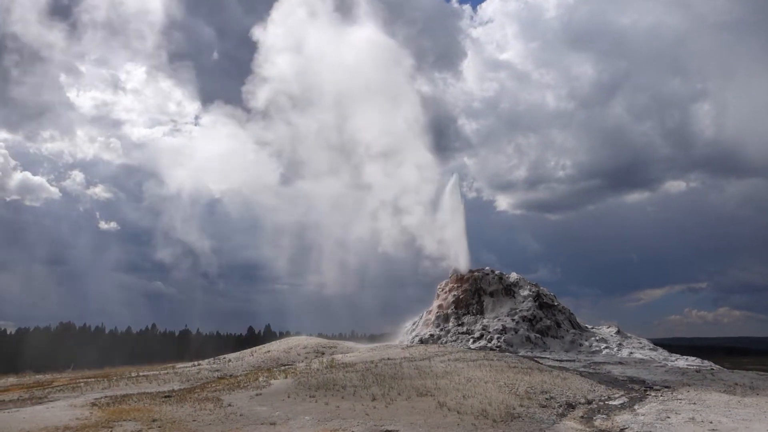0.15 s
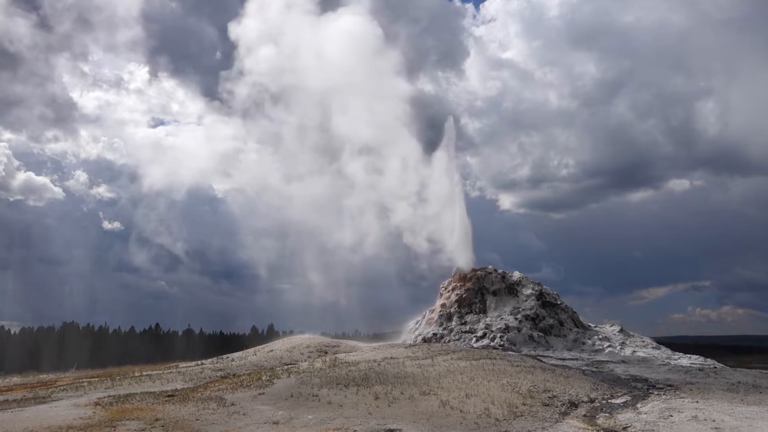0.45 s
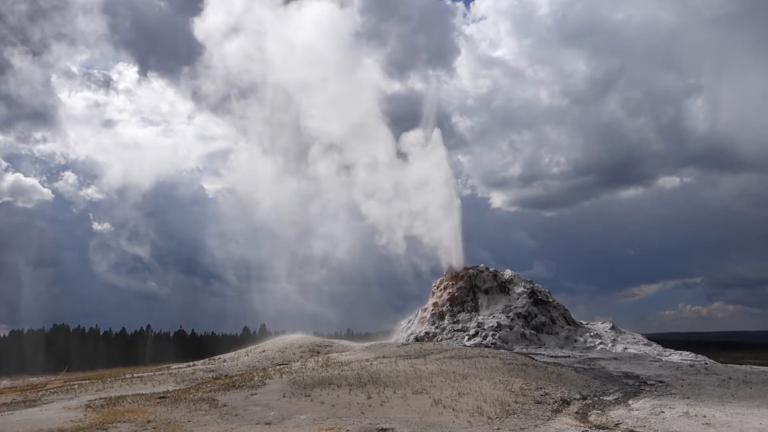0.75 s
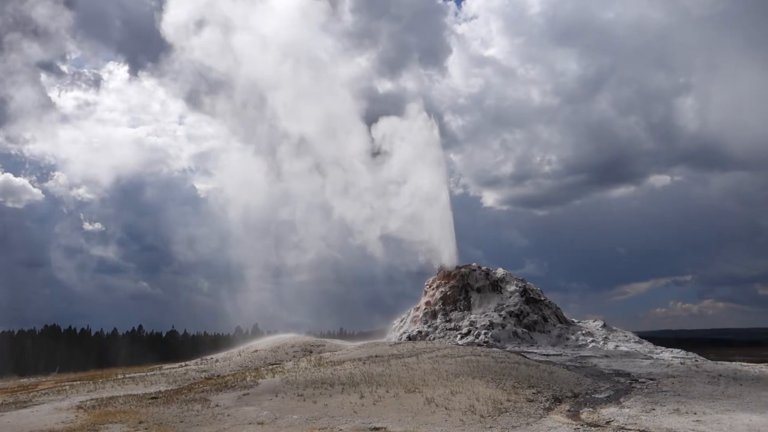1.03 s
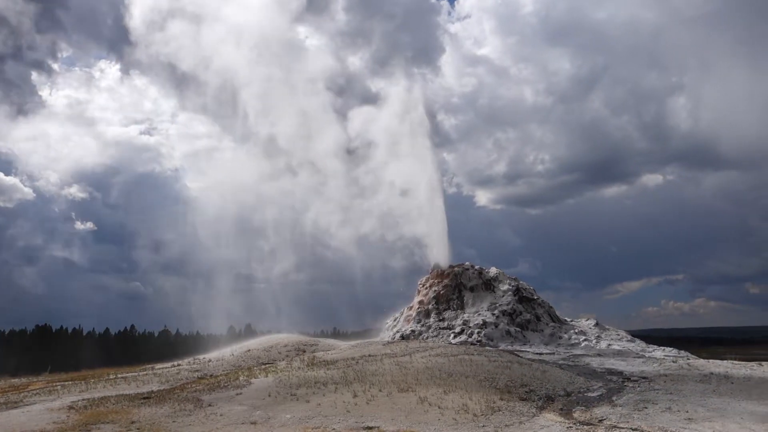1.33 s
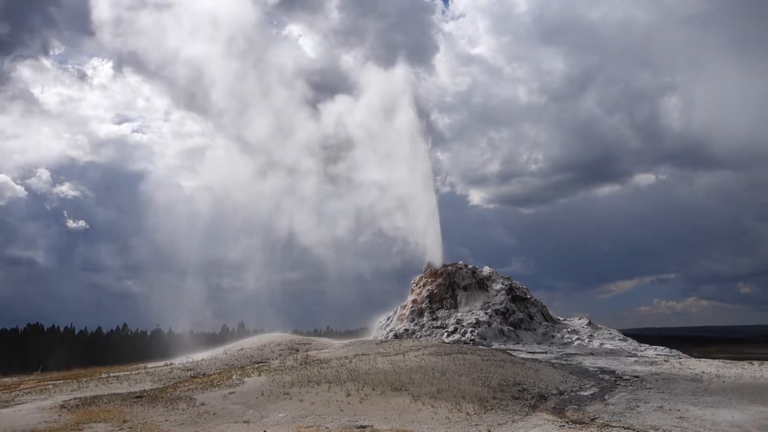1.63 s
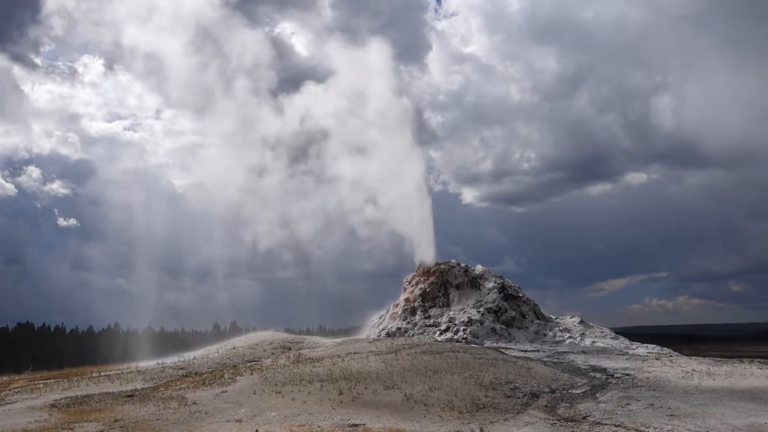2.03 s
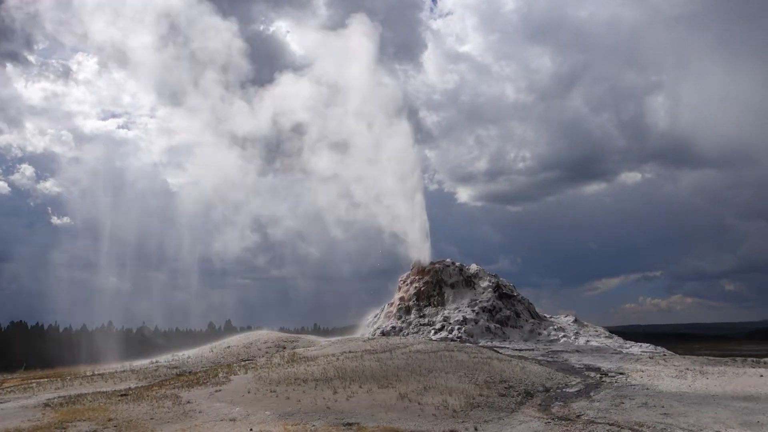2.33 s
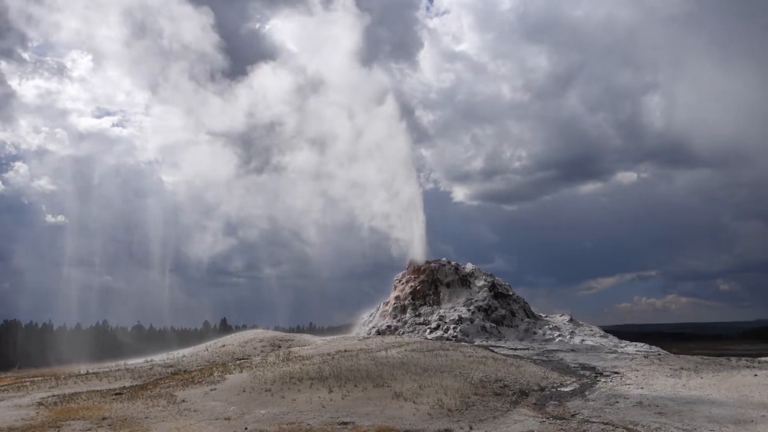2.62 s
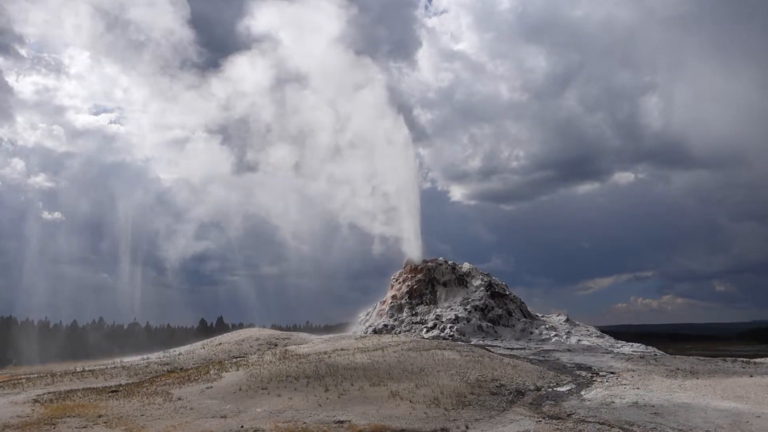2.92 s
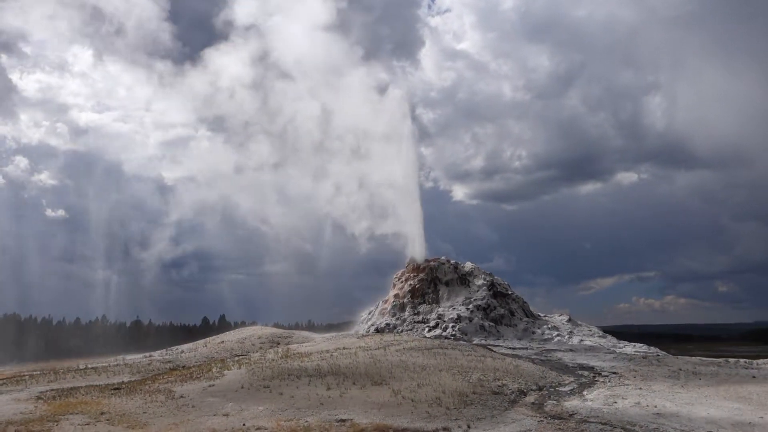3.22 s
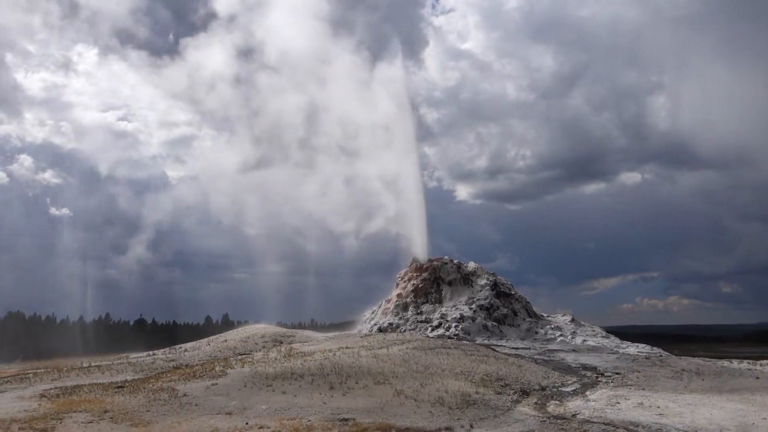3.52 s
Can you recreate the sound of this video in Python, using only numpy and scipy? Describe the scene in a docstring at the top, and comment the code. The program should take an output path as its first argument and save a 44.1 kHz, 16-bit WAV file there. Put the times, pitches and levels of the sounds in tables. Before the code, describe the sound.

Wind rumbles, flutters and thumps unevenly on the microphone in the open air. Behind it runs the soft hissing rush of a distant geyser, and late on a little water lands faintly on rock.

```python
"""A geyser erupts some way off: a hissing rush of steam and water, fine spray on top, water landing on rock.
Gusty wind buffets the two microphone ports: a low rumble, a body, and a flutter that grows with each gust.
Single eddies hit the ports, small ones as pops, large ones as round thumps.
Two small splashes and two faint ticks come late in the scene."""
import sys
import numpy as np
from scipy import signal
from scipy.fft import rfft, irfft, next_fast_len
from scipy.io import wavfile
from scipy.ndimage import uniform_filter1d, map_coordinates

SR = 44100
rng = np.random.default_rng(int(sys.argv[2]) if len(sys.argv) > 2 else 0)


def dump_mix(stems):
    """Bounce the given channels to the path in sys.argv[1] as a 16-bit WAV at rate SR."""
    frames = np.atleast_2d(stems).T  # one column per channel
    limited = np.clip(frames, -1, 1)  # hard clip at full scale
    pcm = np.round(limited * 32767).astype(np.int16)
    wavfile.write(sys.argv[1], SR, pcm)


N = 161406
TOP_HZ = 15720

# Jet strength. Each row: time in seconds, rush level in dB, spray level in dB (both relative).
JET_LEVELS = [(0, -52, -66), (.18, -55, -71), (.28, -52.5, -66.5), (.4, -53, -68.5), (.47, -51.5, -64.5),
              (.6, -51.5, -66.5), (.76, -55.5, -69.5), (.94, -52, -65.5), (1.0, -56, -73.5),
              (1.1, -57, -72.5), (1.15, -56, -69), (1.46, -58, -71.5), (1.68, -56, -68),
              (1.99, -54.5, -67.5), (2.04, -51, -63), (2.16, -52.5, -64.5), (2.3, -55, -70.5),
              (2.48, -56, -72.5), (2.53, -55, -67), (2.72, -57, -72), (2.88, -56, -69.5), (3.0, -58, -76),
              (3.14, -53.5, -69), (3.34, -53, -71.5), (3.65, -53, -67.5)]
# Jet spectra. Each row: frequency in Hz, relative density in dB.
RUSH_SPECTRUM = [(150, -10.5), (500, -7), (1000, 5.5), (1500, -2), (2000, 1), (2500, -0.5), (3000, -3.5),
                 (3500, -5), (4000, -7), (4700, -9.5), (5600, -20.5), (8000, -40), (15000, -83)]
SPRAY_SPECTRUM = [(3000, -19), (5000, 3.5), (6000, 4.5), (7000, 6.5), (8200, 4), (9500, -1.5),
                  (12000, -3.5), (15500, -10)]
# Wind rumble. Each row: time in seconds, relative level in dB.
RUMBLE_LEVELS = [(0.0, -21.5), (0.12, -36), (0.33, -28), (0.44, -30.5), (0.52, -26.5), (0.66, -22),
                 (0.72, -37), (0.77, -18.5), (0.86, -27.5), (1.1, -25.5), (1.28, -27), (1.47, -32),
                 (1.56, -24), (1.62, -30), (1.7, -21.5), (1.8, -34.5), (1.88, -25.5), (1.98, -32),
                 (2.1, -27), (2.36, -26), (2.44, -25.5), (2.58, -27), (2.74, -27.5), (3.06, -22.5),
                 (3.14, -36), (3.2, -23.5), (3.44, -29.5), (3.65, -28.5)]
# Gust strength. Each row: time in seconds, body level in dB, flutter level in dB (both relative).
GUST_LEVELS = [(0.0, -43, -24.5), (0.04, -17, -25), (0.12, -25, -30), (0.16, -19, -25), (0.2, -26.5, -40),
               (0.22, -21, -30), (0.28, -25, -39.5), (0.32, -19, -20.5), (0.36, -25, -43), (0.4, -25, -41),
               (0.44, -47.5, -59), (0.48, -27, -34), (0.54, -30, -40.5), (0.58, -20, -37), (0.62, -20, -27),
               (0.74, -26, -39.5), (0.8, -24.5, -37.5), (0.86, -23.5, -25), (0.89, -22, -32.5),
               (0.96, -22, -21), (1.02, -23.5, -28.5), (1.07, -18, -24), (1.14, -24, -34),
               (1.25, -17, -21.5), (1.34, -23.5, -32), (1.44, -19.5, -24.5), (1.55, -21.5, -23.5),
               (1.6, -21.5, -26.5), (1.63, -29, -33.5), (1.72, -24.5, -30), (1.76, -28.5, -43),
               (1.8, -23, -27), (1.84, -28, -40), (1.88, -19.5, -29), (1.92, -31, -41), (2.0, -18.5, -30.5),
               (2.03, -26.5, -39), (2.07, -20.5, -32), (2.14, -29, -45.5), (2.26, -20, -26.5),
               (2.32, -24.5, -37.5), (2.46, -20, -24.5), (2.49, -25, -40), (2.64, -19, -27),
               (2.69, -23, -30), (2.74, -18.5, -23.5), (2.84, -22.5, -23.5), (2.9, -23, -30),
               (2.96, -25, -23.5), (3.06, -22.5, -31), (3.12, -23.5, -35.5), (3.18, -21.5, -24),
               (3.23, -27, -45), (3.42, -21, -26), (3.44, -31.5, -41), (3.47, -22.5, -30),
               (3.56, -34, -40.5), (3.65, -23.5, -32.5)]
# Wind spectra. Each row: frequency in Hz, relative density in dB.
RUMBLE_SPECTRUM = [(12, -21.5), (25, -13), (40, -3), (60, 1.5), (100, 3), (140, 0.5), (200, -5), (400, -62),
                   (1200, -140)]
BODY_SPECTRUM = [(60, -24), (120, -1.5), (160, 1), (250, 1), (350, -3), (480, -11.5), (700, -30.5),
                 (1500, -92), (3000, -140)]
FLUTTER_SPECTRUM = [(150, -35.5), (300, -2.5), (430, 2.5), (600, -3.5), (800, -12.5), (1100, -22.5),
                    (1600, -36), (3000, -73), (6000, -140)]
# Only large eddies reach both ports alike. Each row: frequency in Hz, left-right correlation.
WIND_CORRELATION = [(60, 0.83), (100, 0.92), (160, 0.78), (270, 0.24), (450, 0.006), (740, -0.19)]
# Eddies. Each row: centre in seconds, peak in dB before pan and low cut, pan in dB, half-width in seconds.
EDDY_HITS = [(0.017, -14.5, 1, 0.00039), (0.046, -18, -6, 0.00039), (0.12, -14.5, 2, 0.0026),
             (0.149, -21.5, 10, 0.0004), (.218, -11.5, 4, 0.00084), (.322, -28, 8, 0.00031),
             (.387, -16.5, 4.5, 0.00041), (0.48, -14.5, 4, 0.0017), (0.518, -18, -3, 0.00085),
             (0.592, -18, -9, 0.0012), (.608, -16.5, 1, 0.00034), (.665, -17, 1, 0.00042),
             (.707, -14, 3, 0.00041), (.851, -18, -5, 0.00039), (0.942, -13, -5, 0.0005),
             (.975, -21.5, -2, 0.0003), (1.083, -17.5, 3, 0.00035), (1.249, -22.5, 0, 0.00027),
             (1.28, -19, 6, 0.001), (1.384, -19.5, 1, 0.00041), (1.54, -17, 6.5, 0.00034),
             (1.586, -25, 4, 0.00038), (1.812, -16, -6, 0.00052), (2.093, -16.5, -5, 0.00031),
             (2.098, -18.5, 1, 0.0017), (2.163, -16, -8, 0.00057), (2.252, -15.5, 3, 0.00073),
             (2.369, -15.5, -7.5, 0.0026), (2.463, -17, -4, 0.00034), (2.71, -18, 6, 0.00042),
             (2.827, -20, -6, 0.00038), (2.997, -23, -1, 0.0003), (3.095, -16, 1, 0.00059),
             (3.201, -14, 5.5, 0.00041), (3.303, -20.5, 5, 0.00045), (3.457, -13.5, 0, 0.00085),
             (3.476, -14, 1, 0.0014)]
# Water landing on rock. Each row: time in seconds, level in dB.
FALL_LEVELS = [(.4, -75), (.55, -52), (.7, -66.5), (2.85, -68), (3.0, -54.5), (3.28, -55.5), (3.42, -60.5),
               (3.6, -56)]
# Splashes. Each row: start in seconds, level in dB, centre in Hz, width in octaves,
# decay in seconds, pan in dB.
SPLASH_HITS = [(2.046, -69, 12000, .1, .008, 2), (3.278, -44, 1700, .55, .006, -10)]
# Dry ticks. Each row: time in seconds, peak in dB, centre in Hz, width in octaves.
TICK_HITS = [(3.416, -36, 10000, 0.9), (3.549, -47, 7400, 0.25)]


def amp(db):
    """Decibels to gain."""
    return 10 ** (np.asarray(db) / 20)


def unit(x):
    """Scale to rms 1."""
    return x / np.sqrt(np.mean(x ** 2) + 1e-20)


def pan(db):
    """Stereo gains for a left-minus-right level."""
    return amp(np.array([[db], [-db]]) / 2)


def curves(rows):
    """One value per sample for each column after the time."""
    times_s, *columns = np.transpose(rows)
    return [np.interp(np.arange(N) / SR, times_s, column) for column in columns]


def along(points, hz):
    """Read (Hz, value) points on a log axis."""
    knots_hz, values = np.transpose(points)
    return np.interp(np.log(hz + 1), np.log(knots_hz + 1), values)


def wobble(knots_per_s):
    """Smooth random curve."""
    return map_coordinates(rng.standard_normal(N // 10), [np.arange(N) * knots_per_s / SR], mode="wrap")


def filtered(x, response):
    """Apply a gain given as a function of Hz."""
    size = next_fast_len(N + SR // 2)
    return irfft(rfft(x, size) * response(np.fft.rfftfreq(size, 1 / SR)), size)[..., :N]


def band(x, centre_hz, octaves):
    """Bell-shaped band-pass."""
    return filtered(x, lambda hz: np.exp(-.5 * (np.log2((hz + 1) / centre_hz) / octaves) ** 2))


def noise(spectrum, correlation):
    """Coloured stereo noise, rms 1; left-right correlation is a number or (Hz, value) points."""
    def response(hz):
        alike = along(correlation, hz) if np.ndim(correlation) else np.full(len(hz), correlation)
        angle = np.arccos(np.clip(alike, -1, 1)) / 2
        return amp(along(spectrum, hz)) * np.array([np.cos(angle), np.sin(angle)])
    mid, side = filtered(rng.standard_normal((2, N)), response)
    return unit(np.array([mid + side, mid - side]))


def steadied(x, span_s):
    """Even out power over spans beyond span_s; keep the fine grain."""
    size = max(int(span_s * SR), 2)
    power = uniform_filter1d(uniform_filter1d(np.mean(x ** 2, axis=0), size), size)
    return x / np.sqrt(np.abs(power) + 1e-9)


def geyser(rush_trim_db=-.5, spray_trim_db=-2.5):
    """Jet of steam and water: rush and spray surge together and flicker slightly."""
    rush_db, spray_db = curves(JET_LEVELS)
    surge_db = .9 * wobble(knots_per_s=30) + .95 * wobble(knots_per_s=110)
    rush = noise(RUSH_SPECTRUM, correlation=.68) * amp(rush_trim_db + rush_db + surge_db)
    spray = noise(SPRAY_SPECTRUM, correlation=.56) + amp(-6.5) * droplets()
    spray *= amp(spray_trim_db + spray_db + surge_db)
    return rush * pan(-4) + spray * pan(1)


def droplets(drops_per_s=350, median_hz=6300, log_spread=.3, decay_cycles=5):
    """Drops in the spray: a dense patter of tiny damped rings, rms 1."""
    count = int(drops_per_s * N / SR)
    when, size, left_share = rng.random((count, 3)).T
    hz = np.clip(median_hz * np.exp(log_spread * rng.standard_normal(count)), 1, TOP_HZ)
    age_samples = np.arange(SR // 200)
    cycles = hz[:, None] * age_samples / SR
    rings = size[:, None] ** 2 * np.sin(2 * np.pi * cycles) * np.exp(-cycles / decay_cycles)
    index = ((when * N).astype(int)[:, None] + age_samples).ravel()
    gains = np.sqrt([left_share, 1 - left_share])
    return unit(np.array([np.bincount(index, (rings * gain[:, None]).ravel(), N)[:N] for gain in gains]))


def wind(churn_per_s=85, rumble_trim_db=-3, body_trim_db=-2.5, flutter_trim_db=-2.05):
    """Turbulence at the ports: the higher the layer, the harder it churns and the less the ports agree."""
    body_db, flutter_db = curves(GUST_LEVELS)
    shared_db = 3.5 * wobble(churn_per_s)
    churn_db = shared_db + 2.5 * np.array([wobble(churn_per_s), wobble(churn_per_s)])
    rumble = steadied(noise(RUMBLE_SPECTRUM, WIND_CORRELATION), span_s=.055)
    body = steadied(noise(BODY_SPECTRUM, WIND_CORRELATION) * amp(.56 * churn_db), span_s=.035)
    flutter = steadied(noise(FLUTTER_SPECTRUM, WIND_CORRELATION) * amp(churn_db), span_s=.035)
    rumble *= amp(rumble_trim_db + curves(RUMBLE_LEVELS)[0])
    body *= amp(body_trim_db + body_db)
    flutter *= amp(flutter_trim_db + flutter_db)
    return rumble + (body + flutter) * pan(-1.5)


def eddies(port_lag_s=.00049, low_cut_hz=55):
    """One suck and push of pressure each, reaching the ports slightly apart; the low cut rounds it."""
    out, t = np.zeros((2, N)), np.arange(N) / SR
    lags_s = port_lag_s * rng.uniform(-1.07, 1, len(EDDY_HITS))
    for (centre_s, db, pan_db, half_width_s), lag_s in zip(EDDY_HITS, lags_s):
        offset = (t - centre_s + lag_s * np.array([[1], [-1]])) / half_width_s
        out += amp(db) * pan(pan_db) * offset * np.exp((1 - offset ** 2) / 2)
    return filtered(out, lambda hz: hz ** 4 / (hz ** 4 + low_cut_hz ** 4))


def falling_water():
    """Thrown water lands on rock: a hollow wash that spatters unevenly."""
    wash = band(noise(RUSH_SPECTRUM, correlation=.68), centre_hz=1420, octaves=.25)
    spatter_db = 4 * wobble(knots_per_s=120)
    return unit(wash * amp(spatter_db)) * amp(curves(FALL_LEVELS)[0]) * pan(-5.5)


def splashes():
    """Slaps of water: noise bursts with instant onset and fast decay."""
    out, t = np.zeros((2, N)), np.arange(N) / SR
    for start_s, db, centre_hz, octaves, decay_s, pan_db in SPLASH_HITS:
        fade = (t >= start_s) * np.exp(-np.abs(t - start_s) / decay_s)
        burst = band(rng.standard_normal(N) * fade, centre_hz, octaves)
        fade_rms = np.sqrt(np.mean(fade ** 2))
        out += amp(db) * pan(pan_db) * unit(burst) * fade_rms
    return out


def ticks():
    """Bright clicks close to the microphone: band-passed impulses."""
    out = np.zeros(N)
    for time_s, db, centre_hz, octaves in TICK_HITS:
        click = band(signal.unit_impulse(N, int(time_s * SR)), centre_hz, octaves)
        out += amp(db) * click / click.max()
    return out


def microphone_hiss():
    """Steady white self-noise."""
    return amp(-78.5) * rng.standard_normal((2, N))


def scene():
    """Geyser in open air, wind on the microphone."""
    water = geyser() + falling_water() + splashes()
    return water + wind() + eddies() + ticks() + microphone_hiss()


def record(dry):
    """The camera keeps nothing above its band limit."""
    return filtered(dry, lambda hz: hz < TOP_HZ)


dry = scene()
out = record(dry)
dump_mix(out)
```